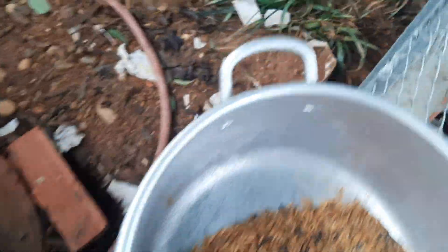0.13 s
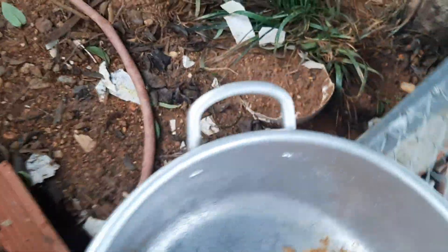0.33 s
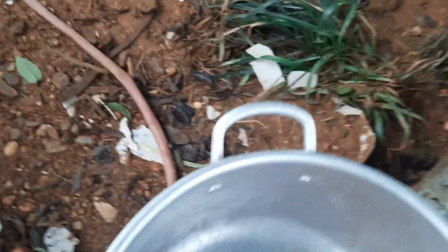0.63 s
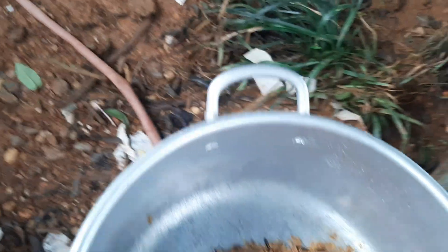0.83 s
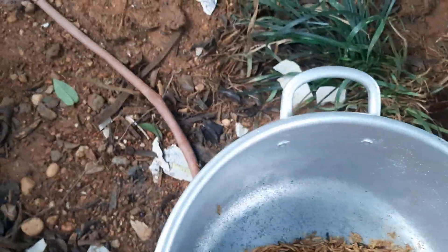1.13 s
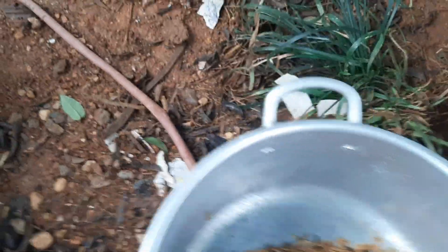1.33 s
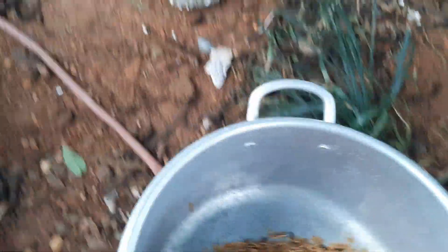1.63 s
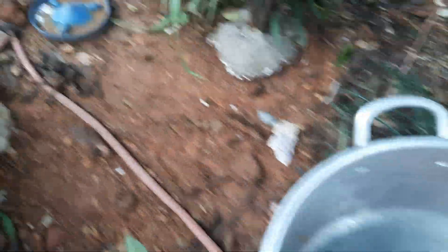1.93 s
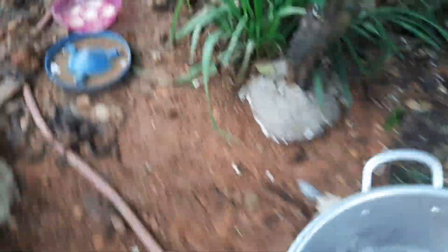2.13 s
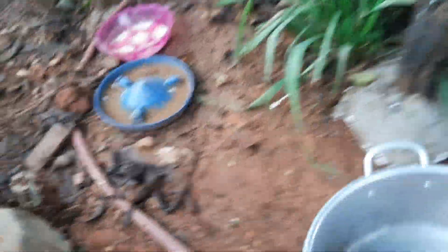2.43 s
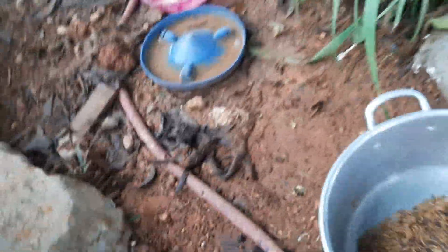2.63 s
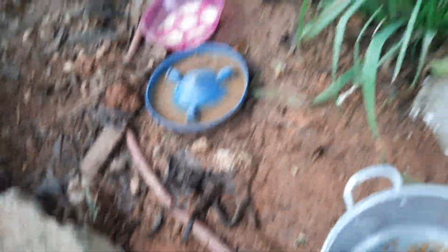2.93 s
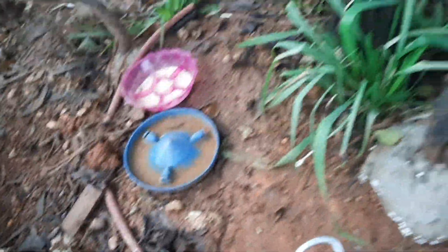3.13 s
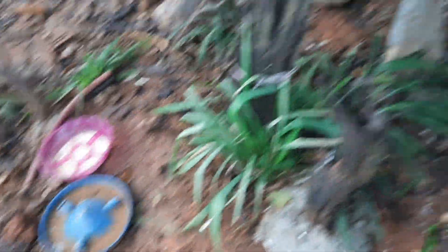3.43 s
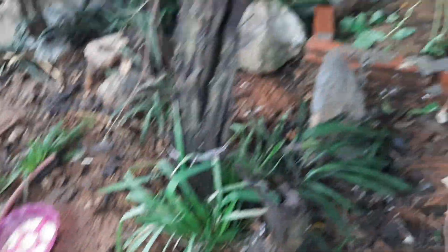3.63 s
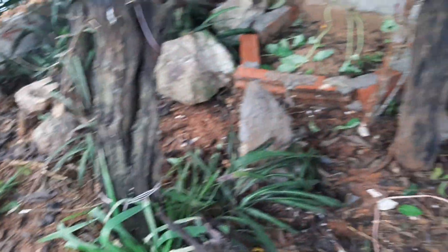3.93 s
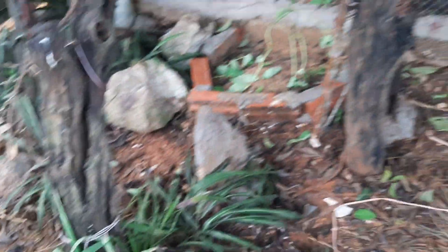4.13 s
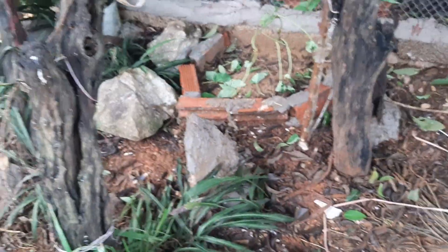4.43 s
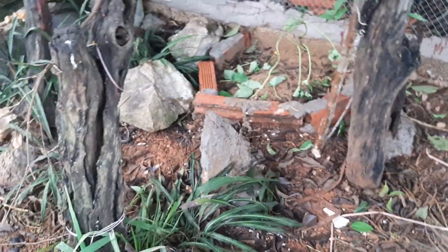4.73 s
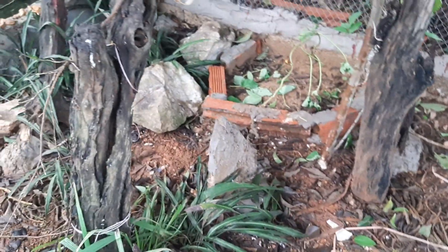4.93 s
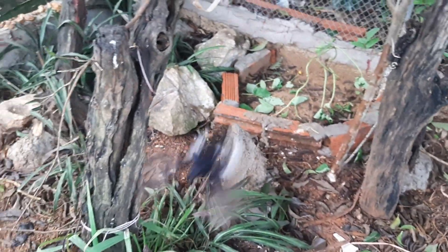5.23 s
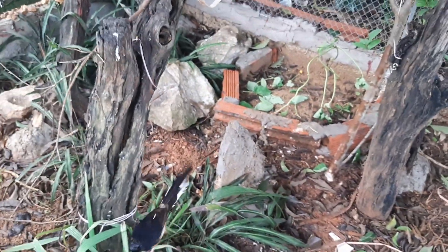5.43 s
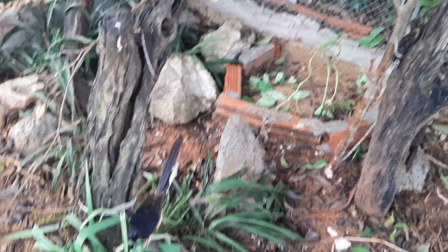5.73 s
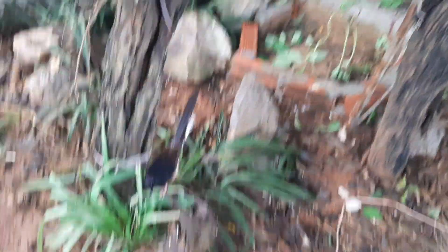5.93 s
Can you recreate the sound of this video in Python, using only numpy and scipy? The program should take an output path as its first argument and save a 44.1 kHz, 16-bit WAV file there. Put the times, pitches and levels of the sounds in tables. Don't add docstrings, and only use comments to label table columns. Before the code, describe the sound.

A handheld microphone moves past a metal feed pot outdoors. Shimmering insects and a faint engine hum run throughout. Sharp clicks, dry grain rustles and small knocks gather in the first half, with short burry and clear bird calls between them. The loudest clank comes just before the middle. Afterwards it is quieter: a few footfalls, faint cockerels, falling chirps and a brief feathery flutter with clicks.

```python
import sys
import numpy as np
from scipy import signal
from scipy.fft import rfft, irfft, next_fast_len
from scipy.io import wavfile
from scipy.ndimage import uniform_filter1d

SR = 44100
rng = np.random.default_rng(int(sys.argv[2]) if len(sys.argv) > 2 else 0)


def wrap_up_sound(samples):
    columns = np.atleast_2d(samples).T
    tamed = np.clip(columns, -1, 1)
    steps = np.round(tamed * 32767).astype(np.int16)
    wavfile.write(sys.argv[1], SR, steps)


def gain_from_decibels(decibels):
    exponent = np.asarray(decibels, float) / 20
    return 10 ** exponent


N = 268657
TIME = np.arange(N) / SR


def unit(x):
    return x / np.sqrt(np.mean(x ** 2))


def curves(table):
    s, *columns = np.transpose(table)
    return [np.interp(TIME, s, column) for column in columns]


def ring(x, hz, width_hz):
    hz = min(hz, SR / 2.2)
    return signal.lfilter(*signal.iirpeak(hz, hz / width_hz, fs=SR), x)


def band(x, lo_hz, hi_hz, order=2):
    limits = [lo_hz, min(hi_hz, SR / 2.2)]
    return signal.sosfilt(signal.butter(order, limits, "bandpass", fs=SR, output="sos"), x)


def pair(alike):
    mid, side = rng.standard_normal((2, N))
    alike = np.clip(alike, 0, 1)
    opposite = side * np.array([[1], [-1]])
    return (np.sqrt(1 + alike) * mid + np.sqrt(1 - alike) * opposite) / np.sqrt(2)


def walk(rate):
    hold = int(SR / rate)
    return uniform_filter1d(np.repeat(rng.standard_normal(N // 100), hold)[:N], hold)


def add(out, s, sound):
    i = int(s * SR)
    out[:, i:i + sound.shape[1]] += sound[:, :N - i]


def swells(table, rise_s, fall_s, rest_db):
    t = TIME[::32]
    power = gain_from_decibels(rest_db) ** 2
    for s, hold, db in table:
        away = np.maximum((s - t) / rise_s, (t - s - hold) / fall_s)
        power = power + gain_from_decibels(db - 20 * np.maximum(away, 0)) ** 2
    return np.interp(TIME, t, np.sqrt(power))


def garden(x, t60, wet_db, gap_s):
    t = TIME[:int(min(t60, .5) * SR)]
    tail = rng.standard_normal((2, len(t))) * np.exp(-np.log(1000) * t / t60) * (t > gap_s)
    tail /= np.sqrt(np.sum(tail ** 2, axis=1, keepdims=True))
    return x + gain_from_decibels(wet_db) * signal.oaconvolve(x, tail, axes=1)[:, :N]


def choir(song, beat_hz, depth, flicker_db):
    out = 0
    for hz, width_hz, db in song:
        beats = beat_hz * (1 + 0.14 * rng.standard_normal((2, 1)))
        bursts = 1 + depth * np.sin(2 * np.pi * (beats * TIME + rng.random((2, 1))))
        voices = rng.standard_normal((2, N)) * bursts
        for _ in range(2):
            voices = ring(voices, hz, 4.1 * width_hz)
        out = out + gain_from_decibels(db + flicker_db * walk(12)) * unit(voices)
    return unit(out)


def trillers():
    # wing f/Hz, strokes per second/Hz, level/dB
    singers = [(4335, 58, -2), (4310, 67, -2), (4274, 56, 0), (4230, 63, -3), (4188, 47, -7.5)]
    stroke_depth, wing_waver, fading_db = .8, .002, 4.5
    out, drift = 0, .004 * uniform_filter1d(walk(3), size=9000)
    for hz, rate, db in singers:
        strokes = 1 + stroke_depth * np.sin(2 * np.pi * np.cumsum(rate * (1 + 0.04946 * walk(6))) / SR)
        phase = 2 * np.pi * np.cumsum(hz * (1 + drift + wing_waver * walk(40))) / SR
        ports = [gain_from_decibels(db + fading_db * walk(14)) * np.sin(phase + 2.0 * walk(5)) for port in "LR"]
        out = out + strokes * np.array(ports)
    return unit(out)


def insects():
    # f/Hz, width/Hz, level/dB
    low_song = [(4058, 80, -3.5), (4580, 110, -4.5), (4956, 200, -7.5)]
    high_song = [(7180, 120, -1), (7430, 140, 0), (10500, 800, -5)]
    # t/s, level/dB
    low_levels = [(0, -51), (1.6, -51), (1.81, -52), (2.22, -48.5), (2.75, -50), (3.0, -53.5), (3.3, -55),
                  (3.6, -57), (3.97, -55), (4.21, -51), (4.48, -50.5), (4.83, -50.5), (5.22, -49),
                  (6.09, -51)]
    # t/s, hold/s, level/dB
    high_levels = [(.05, 0.094, -69.5), (.47, 0.019, -61.5), (.96, 0.022, -67), (1.58, 0.053, -61.5),
                   (2.1, 0.29, -65), (2.7, 0.18, -62), (3.65, 0.39, -70), (4.45, 0.11, -73.5),
                   (4.8, 0.075, -63.5), (5.2, 0.048, -62.5), (5.68, 0.15, -71.5), (6.07, 0.098, -63.5)]
    low_db, = curves(low_levels)
    crowd = choir(low_song, beat_hz=65.9, depth=0.3, flicker_db=3.0)
    near_db = 7
    low = gain_from_decibels(low_db + 2.5) * band(unit(crowd + gain_from_decibels(near_db) * trillers()), 3900, 5650, order=6)
    high = choir(high_song, beat_hz=190.0, depth=0.27, flicker_db=4.5)
    high = gain_from_decibels(3.5) * swells(high_levels, rise_s=0.48, fall_s=0.33, rest_db=-81) * high
    return (low + high) * gain_from_decibels(np.array([[-1.1], [1.1]]))


def cricket():
    level_db, until_s = -67, 1.5
    fade = gain_from_decibels(level_db - 12 * np.maximum(TIME - until_s, 0))
    return fade * choir([(3830, 70, 0)], beat_hz=60, depth=.5, flicker_db=3.5)


def blows(table, lo_hz, hi_hz, width, ring_db, alike, lag_s, pan_db):
    out, t = np.zeros((2, N)), TIME[:2400]
    mid, side = rng.standard_normal((len(table), 2, 1, len(t))).swapaxes(0, 1)
    t60s = np.maximum(np.array(table)[:, 3], .004)[:, None, None]
    fades = np.exp(-np.log(1000) * t / t60s)
    noises = (mid + (1 - np.clip(alike, 0, 1)) * side * np.array([[1], [-1]])) * fades
    cracks = band(noises, lo_hz, hi_hz, order=3)
    pan = np.array([[pan_db], [-pan_db]]) / 2
    for (s, db, hz, t60), noise, crack in zip(table, noises, cracks):
        tone = ring(ring(noise, hz, width * hz), hz, width * hz)
        sound = crack / np.abs(crack).max(axis=1, keepdims=True)
        sound = sound + gain_from_decibels(ring_db) * tone / np.abs(tone).max(axis=1, keepdims=True)
        sound[0] = np.interp(t - lag_s, t, sound[0], left=0)
        add(out, s + .0004, gain_from_decibels(db + pan) * sound)
    return out


def pot():
    # t/s, peak level/dB, f/Hz
    tap_events = [(0.52, -32, 2690), (0.602, -43, 2830), (0.672, -45, 1100), (0.7833, -46, 1510),
                  (1.0608, -46, 1120), (1.6002, -43, 2800), (1.672, -46, 2200), (1.70, -41, 2900),
                  (2.037, -28, 1100), (2.1634, -41, 1560), (2.4109, -40, 1610), (2.68, -43, 1700),
                  (2.7282, -40, 3060), (0.817, -30.5, 1680), (0.866, -36, 1560), (0.889, -51, 3330),
                  (0.971, -33, 1440), (0.9928, -26.5, 2680), (1.104, -41, 1420), (1.207, -52, 1430),
                  (1.239, -46, 1450), (1.567, -38, 2660), (1.634, -36, 2590), (1.766, -29, 3470),
                  (1.805, -39.5, 3050), (2.026, -22.5, 1450), (2.13, -33, 1740), (2.2, -34.5, 1660),
                  (2.234, -44, 1406), (2.377, -28, 1380), (2.535, -46, 1700), (2.639, -37, 1540),
                  (2.795, -32, 1090), (2.8072, -9.5, 1435), (2.855, -19.5, 1050), (2.863, -25, 940)]
    # t/s, peak level/dB, f/Hz
    step_events = [(3.388, -47, 1340), (3.4035, -32, 1080), (3.487, -50, 2380), (3.721, -47, 1698),
                   (3.848, -45, 1210), (4.078, -53.5, 2000), (4.938, -38.5, 2120), (4.959, -39, 2100),
                   (5.212, -43.5, 1100), (5.271, -35.5, 3420), (5.352, -44, 3360)]
    # t/s, peak level/dB, f/Hz, topmost treble against the peak/dB
    tick_events = [(.1236, -47, 7800, -6), (.5197, -40, 5950, -16), (.602, -53, 6000, -13),
                   (.692, -52, 7500, -6), (1.039, -44, 7030, -3), (1.1473, -45, 6190, -8),
                   (1.2526, -44, 7310, -6), (1.5658, -39, 7050, -17), (1.6362, -40, 6550, -14),
                   (1.8048, -53, 5750, -8), (2.0737, -35, 7280, -6), (2.2468, -47, 5670, -6),
                   (2.3775, -37, 7790, -12), (3.0959, -54, 7080, -2), (3.6735, -49.5, 7410, -7.5),
                   (5.2101, -49, 7040, -10), (5.452, -54, 7050, -8), (5.684, -56, 5516, -10),
                   (5.2445, -40, 6300, -8), (0.819, -27, 4600, -6), (0.8882, -16.5, 7120, -6),
                   (0.8959, -15.5, 7500, -14), (0.9916, -36, 4800, -14), (1.1123, -39.5, 7180, -7.5),
                   (1.207, -27.5, 6340, -31), (1.7644, -31.5, 5600, -13), (2.026, -31, 7300, -2),
                   (2.516, -41, 5100, -19), (2.6007, -37.5, 7500, -6), (2.8071, -9, 7150, -13),
                   (2.817, -16.5, 6270, -26), (2.821, -22, 4070, -21), (2.862, -33.5, 6400, -2),
                   (3.186, -46, 7800, -7), (3.3354, -42.5, 7500, -18), (3.887, -47, 5480, -7),
                   (3.9789, -47.5, 7220, -6), (4.4705, -46.5, 4770, -9), (4.937, -31.5, 4900, -13.5),
                   (5.1407, -47, 5440, -14), (5.2863, -28, 6700, -5), (5.3557, -38, 4800, -10)]
    # t/s, peak level/dB, f/Hz
    knock_events = [(0.519, -50, 302), (0.8, -51.5, 306), (0.889, -43, 790), (1.219, -49.5, 423),
                    (1.764, -50.5, 242), (1.949, -43.5, 457), (2.024, -43, 277), (2.059, -47, 276),
                    (2.307, -47, 300), (2.376, -44.5, 280), (2.395, -46, 312), (2.42, -48.5, 306),
                    (2.429, -49, 253), (2.679, -49, 409), (2.726, -43.5, 406), (2.806, -29.5, 380),
                    (2.856, -34.5, 410), (2.888, -45.5, 460), (2.918, -52, 433), (2.944, -44, 430),
                    (3.049, -47.5, 430), (3.106, -53, 390), (3.388, -48.5, 300), (3.402, -42, 345),
                    (4.732, -68.5, 791), (4.747, -57.5, 770)]
    # t/s, f/Hz, level/dB, time to fall 60 dB/s
    wall_rings = [(.817, 1570, -36, .05), (.890, 10935, -46, .35), (.890, 11055, -49, .3),
                  (.890, 3240, -40, .08), (1.208, 1410, -40, .05), (2.808, 910, -30, .07),
                  (2.808, 421, -38, .16), (2.808, 2950, -22, .035), (2.808, 510, -40, .15),
                  (2.856, 468, -40, .2)]
    tap_t60, step_t60, tick_t60, knock_t60 = .012, .011, .022, .035

    taps = [(s, db, hz, tap_t60 * np.exp(-.016 * (db + 41.5))) for s, db, hz in tap_events]
    taps += [(*row, step_t60) for row in step_events]
    ticks = [(s, db, hz, tick_t60) for s, db, hz, top_db in tick_events]
    tops = [(s, db + top_db, 11500, tick_t60) for s, db, hz, top_db in tick_events]
    knocks = [(s, db, hz, knock_t60 * np.exp(-.051 * (db + 41.5))) for s, db, hz in knock_events]
    out = blows(taps, 875, 3100, width=0.44, ring_db=-6.5, alike=0.48, lag_s=0.00018, pan_db=-5.0)
    out += blows(ticks, 3200, 7400, width=0.14, ring_db=-6.5, alike=0.25, lag_s=0.00014, pan_db=-2.0)
    out += blows(tops, 11400, 14600, width=0.14, ring_db=-2.5, alike=0.28, lag_s=.00021, pan_db=-3)
    out += blows(knocks, 150, 420, width=0.33, ring_db=1.0, alike=.95, lag_s=.0001, pan_db=-2.5)

    t = TIME[:SR // 2]
    for s, hz, db, t60 in wall_rings:
        phases = 2 * np.pi * rng.random((2, 1)) * min(hz / 3000, 1)
        add(out, s, gain_from_decibels(db) * np.exp(-np.log(1000) * t / t60) * np.sin(2 * np.pi * hz * t + phases))
    return garden(out, t60=.1, wet_db=-10.0, gap_s=.003)


def stir(treble, rest_db):
    # t/s, hold/s, treble level/dB, body level/dB
    scuff_events = [(.891, 0.0029, -35, -74), (1.205, 0.027, -75, -55), (2.027, 0.062, -55.5, -47.5),
                    (2.811, .045, -55, -57.5), (4.94, 0.015, -61, -54)]
    # t/s, hold/s, treble level/dB, body level/dB
    swish_events = [(.54, .15, -89, -66.5), (.8, 0.13, -70, -53.5), (.93, 0.074, -62, -61),
                    (1.05, 0.072, -76, -61), (1.55, 0.19, -77, -62.5), (1.75, 0.14, -78, -68.5),
                    (2.1, 0.023, -58, -49.5), (2.2, 0.097, -71, -55), (2.34, 0.082, -64, -59),
                    (2.455, 0.4, -64.5, -56), (2.86, 0.06, -69, -59), (3.0, 0.23, -70.5, -66.5),
                    (3.28, 0.097, -72.5, -71), (3.45, 0.19, -85, -74), (3.62, 0.086, -69, -65),
                    (3.72, 0.094, -83, -71), (3.95, 0.17, -69, -90), (4.77, 0.1, -64.5, -75),
                    (5.22, .05, -70, -57), (5.285, 0.0075, -51, -53.5), (5.33, 0.046, -58.5, -59.5),
                    (5.43, 0.083, -81.5, -74)]
    column = 2 if treble else 3
    scuffs = [(row[0], row[1], row[column]) for row in scuff_events]
    swishes = [(row[0], row[1], row[column]) for row in swish_events]
    sudden = swells(scuffs, rise_s=.004, fall_s=.038, rest_db=rest_db)
    return np.hypot(sudden, swells(swishes, rise_s=.07, fall_s=.075, rest_db=rest_db))


def rustle():
    sizes_db = 2.3 * np.minimum(rng.exponential(size=N), 6)
    clumps_db = 2.28 * walk(70) + 1.1 * walk(250)
    grains = pair(0.039) * gain_from_decibels(sizes_db + clumps_db)
    treble = stir(True, rest_db=-81.5) * gain_from_decibels(6.5) * unit(band(grains, 3000, 17000, order=1))
    body = stir(False, rest_db=-87) * gain_from_decibels(4.0 + 2.0 * walk(40)) * unit(band(grains, 420, 3800, order=1))
    return (treble + body) * gain_from_decibels(np.array([[-1.2], [1.2]]))


def birds(table, t60, wet_db):
    beak_hz, beak_width_hz, overtone_db = 7700, 900, -17
    out = np.zeros((2, N))
    for s, length, start_hz, end_hz, db, burr_hz in table:
        burr, grain = unit(uniform_filter1d(rng.standard_normal((2, 4000)), size=100))
        u = np.arange(0, 1, 1 / (min(length, .09) * SR))
        hz = start_hz + (end_hz - start_hz) * u + burr_hz * burr[:len(u)]
        phase = 2 * np.pi * np.cumsum(hz) / SR
        voice = np.sin(phase)
        for k in (2, 3):
            beak = np.exp(-((k * hz - beak_hz) / beak_width_hz) ** 2)
            voice = voice + gain_from_decibels(overtone_db) * beak * np.sin(k * phase)
        level = gain_from_decibels(db + burr_hz / 40 * grain[:len(u)]) * np.sin(np.pi * u) ** .7
        add(out, s, level * voice * np.array([[.8], [1.2]]))
    return garden(out, t60, wet_db, gap_s=0.006)


def near_birds():
    # t/s, length/s, start f/Hz, end f/Hz, level/dB
    sharp_bird = [(.331, .004, 3050, 3150, -57), (.336, .006, 3220, 3250, -49),
                  (.345, 0.019, 3600, 2530, -46.5), (.362, .012, 2640, 2580, -46),
                  (.391, 0.008, 3570, 3430, -34), (.400, 0.01, 3360, 3180, -30.5),
                  (.414, 0.0094, 2640, 2880, -43), (.419, 0.0057, 3250, 3750, -34),
                  (.425, 0.0073, 3730, 3480, -32), (.432, 0.0066, 2920, 2800, -41),
                  (.436, 0.017, 3280, 3210, -32.5), (.452, 0.013, 3290, 3260, -39),
                  (2.93, 0.041, 4835, 4860, -53)]
    burry_bird = [(1.436, 0.043, 2350, 2150, -58.5), (1.444, 0.036, 2970, 2500, -49),
                  (1.48, 0.021, 2475, 2310, -56), (1.505, 0.026, 2310, 2260, -53),
                  (1.512, 0.016, 2910, 2780, -46.5), (1.535, 0.011, 2900, 2530, -50),
                  (1.549, 0.019, 2770, 2700, -54), (1.598, 0.015, 2720, 2820, -51),
                  (1.612, 0.0195, 2820, 2430, -45), (1.628, 0.018, 2895, 2780, -43),
                  (3.714, .012, 1899, 1850, -56), (3.72, 0.02, 1715, 1650, -52),
                  (4.715, 0.044, 746, 808, -61.5)]
    clear_bird = [(2.555, 0.0084, 1800, 1950, -51), (2.575, 0.019, 2036, 2250, -39),
                  (2.594, .012, 2160, 2120, -40), (2.613, 0.023, 2105, 2180, -53),
                  (3.637, .021, 1790, 1860, -49), (3.674, 0.017, 1870, 1870, -42),
                  (3.697, 0.012, 1800, 1840, -51)]
    smooth = [(*row, 45) for row in sharp_bird] + [(*row, 40) for row in clear_bird]
    rough = [(*row, 115) for row in burry_bird]
    return birds(smooth, t60=.24, wet_db=-6.0) + birds(rough, t60=.2, wet_db=-3.0)


def far_birds():
    # t/s, length/s, start f/Hz, end f/Hz, level/dB
    fence_bird = [
        (0.053, .04, 1370, 1887, -61.5),
        (0.073, 0.026, 1590, 2240, -63),
        (0.082, 0.019, 2240, 2270, -57.5),
    ]
    # t/s, start f/Hz, level/dB
    far_chirps = [(3.98, 3800, -67), (4.38, 3780, -67.5), (4.775, 3620, -59.5), (5.0, 3570, -67.5),
                  (5.275, 3500, -55.5), (5.344, 3300, -63), (5.372, 3920, -54), (5.66, 3910, -61.5),
                  (5.713, 4000, -52)]
    length_s, fall, burr_hz = .045, .76, 100
    notes = [(s, length_s, hz, fall * hz, db, burr_hz) for s, hz, db in far_chirps]
    notes += [(*row, burr_hz) for row in fence_bird]
    return birds(notes, t60=0.52, wet_db=6.0)


def answer(s, length, hz, db):
    edge_s, edge_db, sag = .035, -9, .01
    return [(s, hz, db + edge_db), (s + edge_s, hz, db), (s + length - edge_s, hz * (1 - sag), db),
            (s + length, hz * (1 - 2 * sag), db + edge_db)]


def cockerels():
    # t/s, pitch f/Hz, level/dB
    near_crow = [(.05, 680, -69.5), (.23, 787, -80), (.27, 806, -64), (.35, 815, -58), (.42, 760, -66),
                 (.62, 771, -64.5), (.85, 727, -65), (.98, 710, -79)]
    # t/s, length/s, pitch f/Hz, level/dB
    answers = [(1.08, .47, 782, -69), (1.091, .38, 708, -70), (3.8, .52, 608, -77), (5.385, .1, 745, -68),
               (5.59, .14, 690, -73), (5.87, .09, 592, -74)]
    out = np.zeros((2, N))
    waver, hoarse = 1 + .025 * walk(200), gain_from_decibels(1.5 * walk(50))
    crows = [(near_crow, -6)] + [(answer(*row), -13) for row in answers]
    for crow, octave_db in crows:
        s, hz, db = np.transpose(crow)
        span = slice(int(s[0] * SR), int(s[-1] * SR))
        phase = 2 * np.pi * np.cumsum(np.interp(TIME[span], s, hz) * waver[span]) / SR
        voice = np.sin(phase) + gain_from_decibels(octave_db) * np.sin(2 * phase)
        out[:, span] += gain_from_decibels(np.interp(TIME[span], s, db)) * hoarse[span] * voice
    return garden(out, t60=0.29, wet_db=3.5, gap_s=0.0085)


def still_air():
    # f/Hz, level per Hz/dB
    air_colour = [(15, -51), (25, -21), (145, 0), (242, -2.5), (427, -34), (607, -23.5), (677, -31.5),
                  (2280, -39.5), (3750, -23), (4250, -10.5), (6050, -31), (7310, -28.5), (8590, -45),
                  (10400, -29.5), (16000, -55)]
    hz, db = np.transpose(air_colour)
    size = next_fast_len(N)
    bins_hz = np.fft.rfftfreq(size, 1 / SR)
    colour = gain_from_decibels(np.interp(np.log(bins_hz + 1), np.log(hz), db)) * (bins_hz > 370)
    air = irfft(rfft(pair(0.14), size) * colour, size)[:, :N]
    return gain_from_decibels(-59.5) * unit(air)


def booms():
    # t/s, hold/s, level/dB
    boom_events = [(0, 1, -63), (.94, 0.055, -53), (1.25, 0.15, -65.5), (1.9, 0.28, -63), (2.35, 0.64, -53),
                   (2.9, 0.33, -58), (3.3, 0.34, -62.5), (3.8, 0.38, -65.5), (5.21, 0.12, -55.5)]
    boom = unit(band(pair(0.79), 100, 560)) * gain_from_decibels(1.9 * walk(30))
    return swells(boom_events, rise_s=0.11, fall_s=0.19, rest_db=-88.5) * gain_from_decibels(-4.5) * boom


def traffic():
    # t/s, level/dB
    hum_levels = [(0, -56), (.96, -57), (1.19, -54.5), (2.1, -53.5), (2.5, -54), (2.8, -51), (3.19, -58),
                  (3.7, -64), (4.25, -58), (4.5, -60), (5.2, -57.5), (5.35, -56), (6.09, -57)]
    # t/s, firing tone f/Hz, level/dB
    lorry = [(0, 141.4, -69), (.5, 139.5, -56.5), (1.2, 135.5, -54.5), (2, 133.6, -62.5), (2.6, 130.8, -69),
             (3.5, 119.9, -66.5), (6.09, 119.2, -88)]
    hum_db, = curves(hum_levels)
    hum = unit(band(pair(0.96), 81.8, 165.6, order=4))
    shoulder = gain_from_decibels(-8.0) * unit(band(pair(0.74), 45, 252))
    out = gain_from_decibels(hum_db - 1.5) * (hum + shoulder)
    first_hz, first_db = curves(lorry)
    for hz, db in ((first_hz, first_db), (1.175 * first_hz, hum_db - 6)):
        phase = 2 * np.pi * np.cumsum(hz * (1 + .008 * walk(10))) / SR
        out = out + gain_from_decibels(db + 2.5 * walk(8)) * np.sin(phase)
    return out


def scene():
    background = (traffic() + booms() + still_air()) * gain_from_decibels(np.array([[-.6], [.6]]))
    animals = near_birds() + far_birds() + cockerels()
    return insects() + cricket() + pot() + rustle() + animals + background


def band_limit(x):
    return signal.sosfilt(signal.butter(12, 16840, fs=SR, output="sos"), x)


def record(dry):
    cut = signal.sosfilt(signal.ellip(8, .2, 60, 15900, fs=SR, output="sos"), dry)
    return band_limit(cut)


dry = scene()
out = record(dry)
wrap_up_sound(out)
```